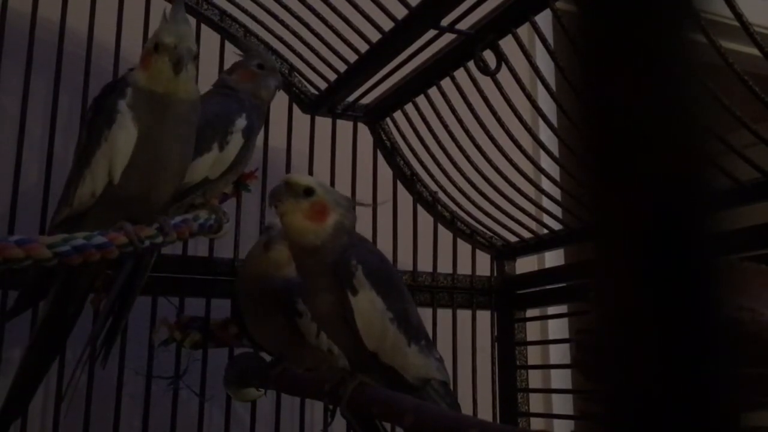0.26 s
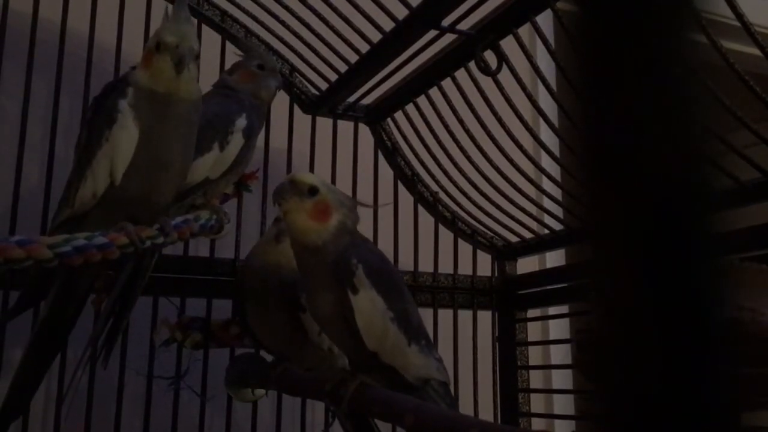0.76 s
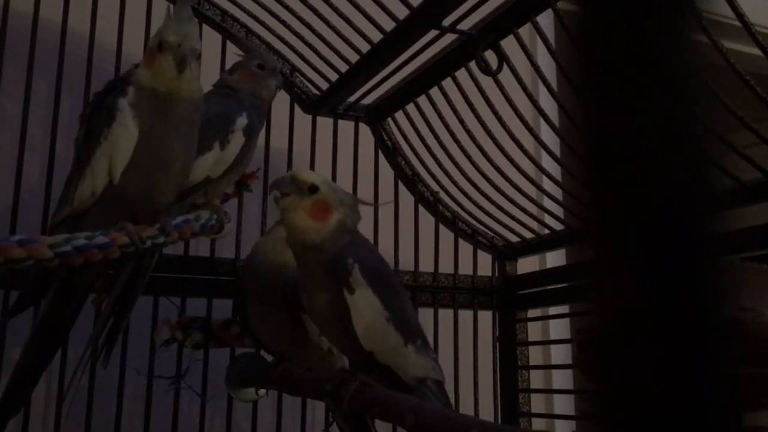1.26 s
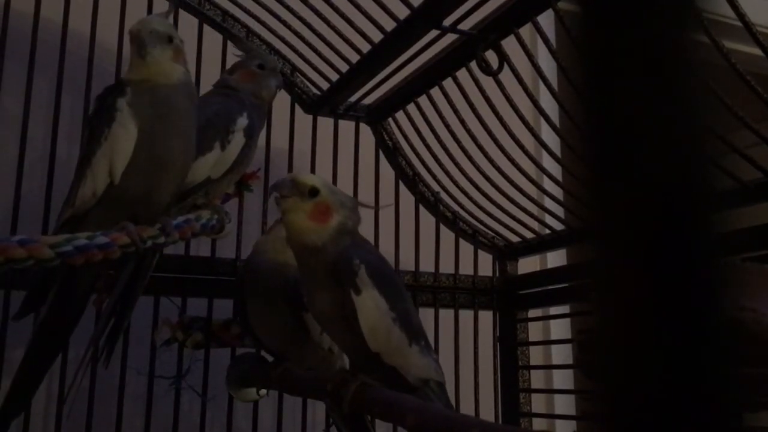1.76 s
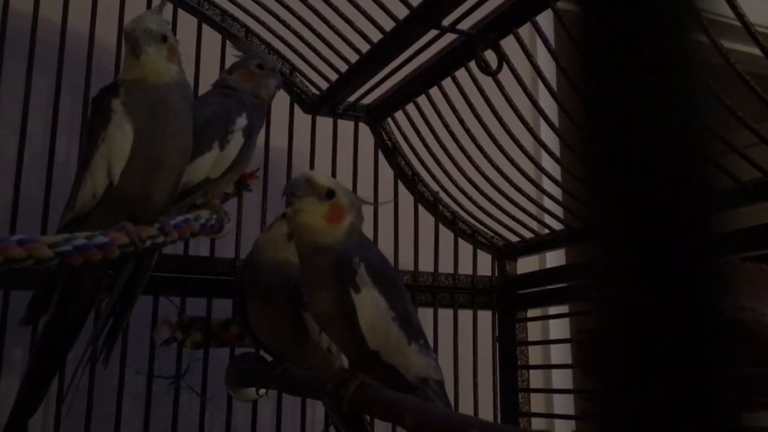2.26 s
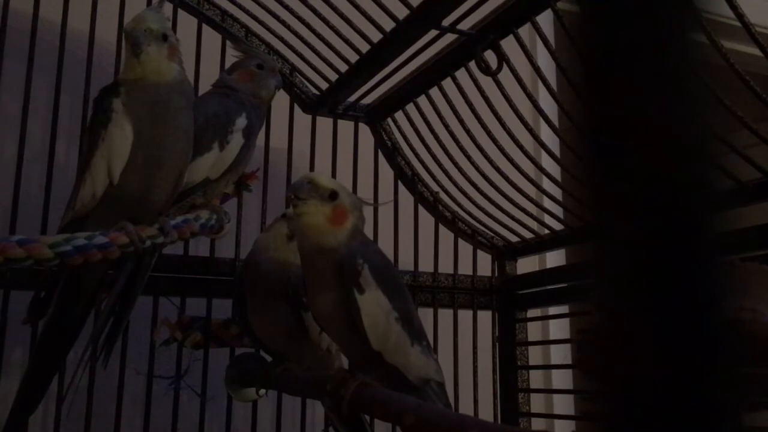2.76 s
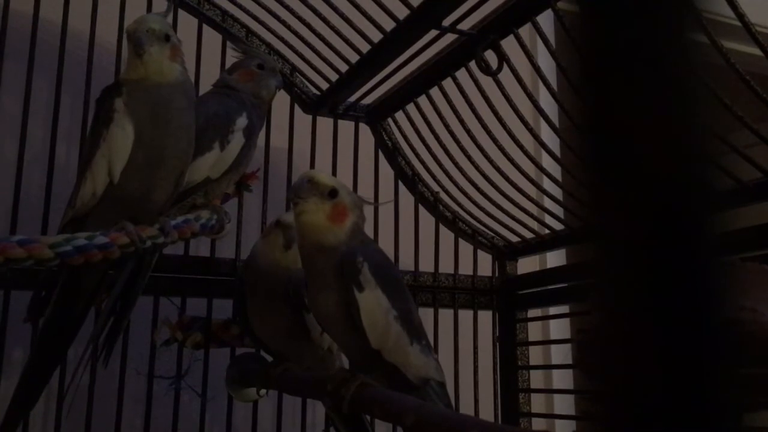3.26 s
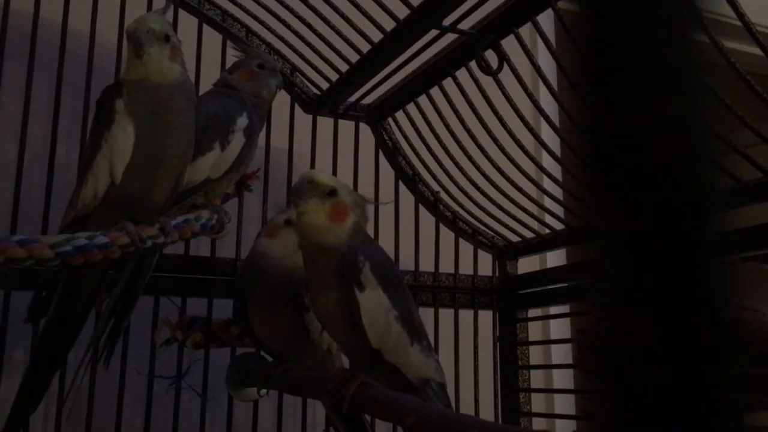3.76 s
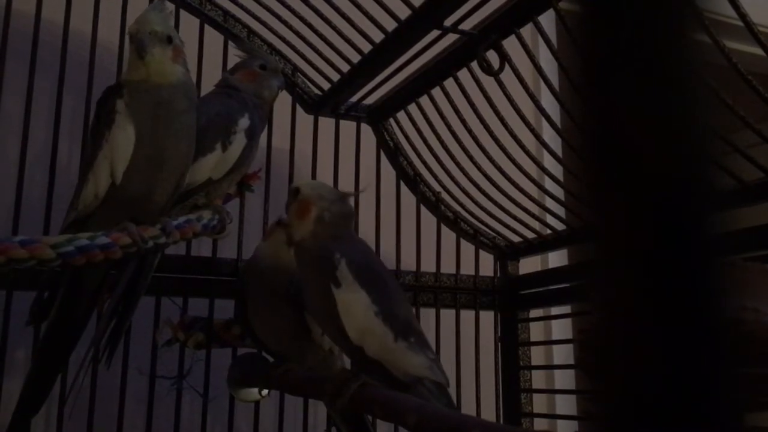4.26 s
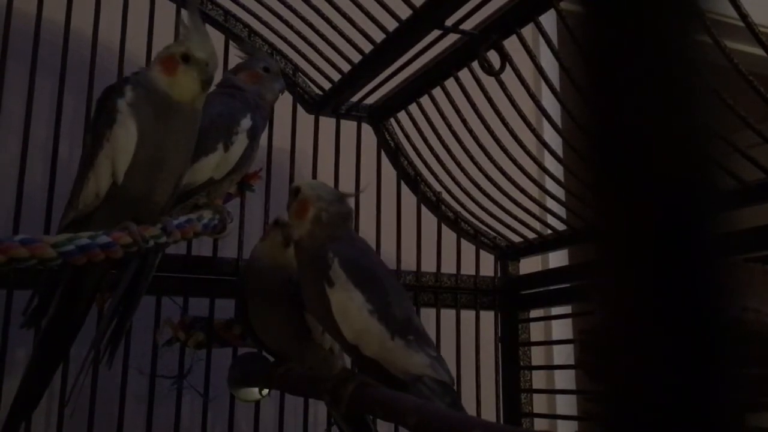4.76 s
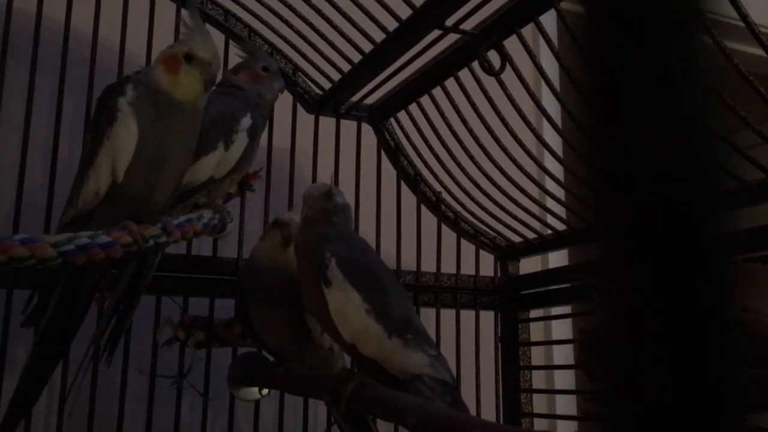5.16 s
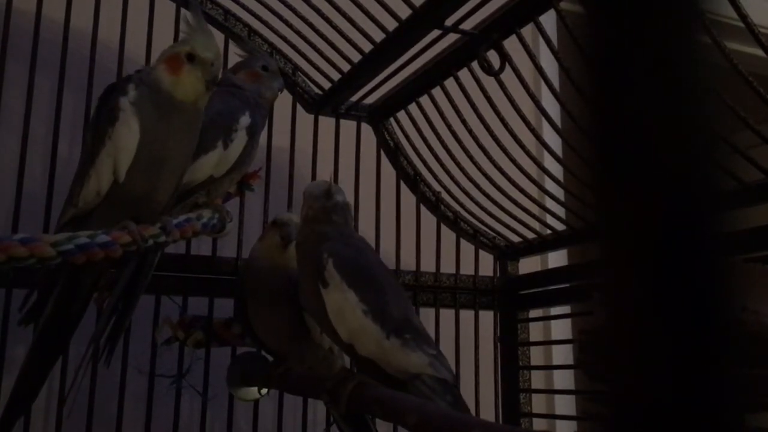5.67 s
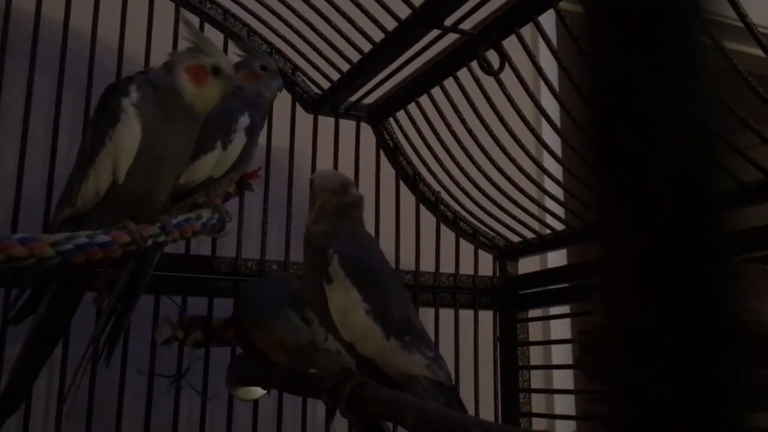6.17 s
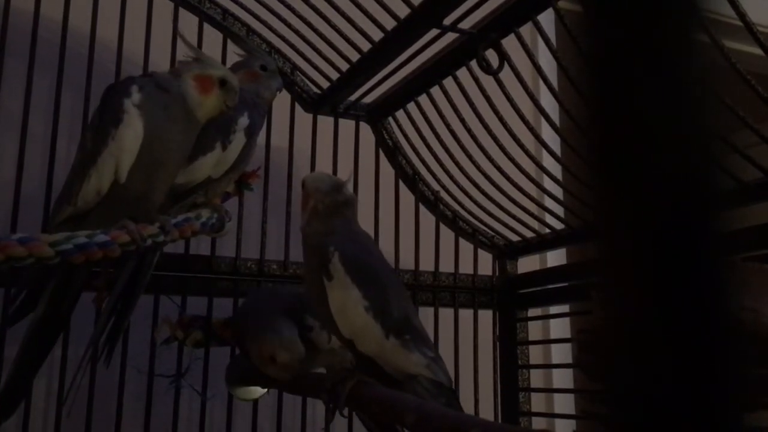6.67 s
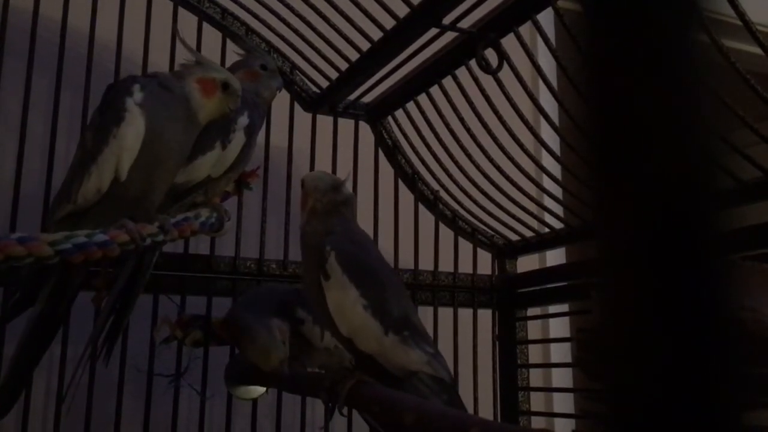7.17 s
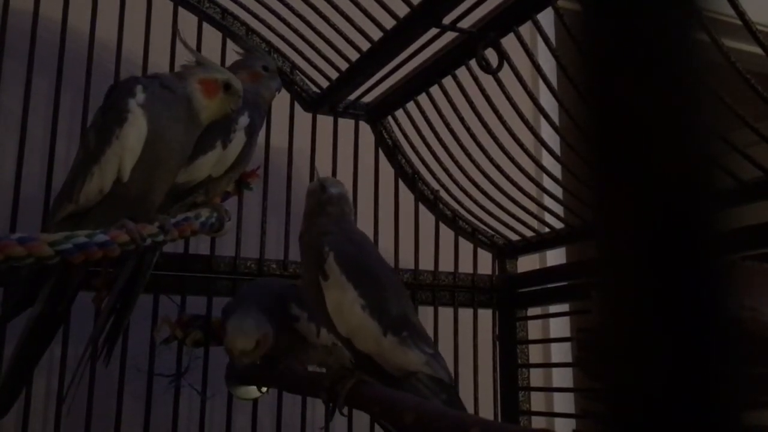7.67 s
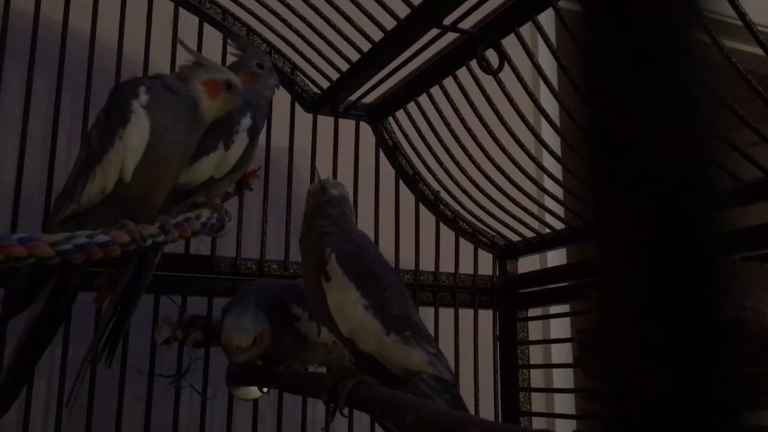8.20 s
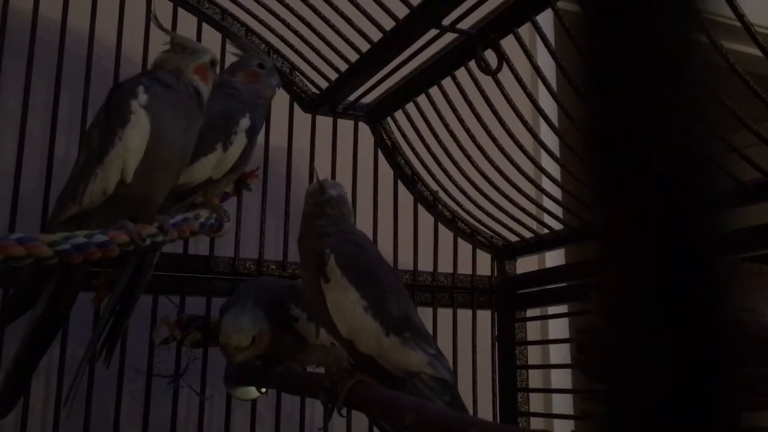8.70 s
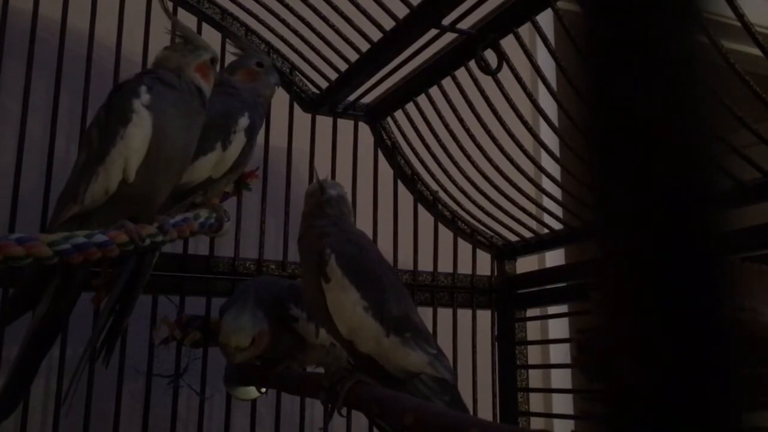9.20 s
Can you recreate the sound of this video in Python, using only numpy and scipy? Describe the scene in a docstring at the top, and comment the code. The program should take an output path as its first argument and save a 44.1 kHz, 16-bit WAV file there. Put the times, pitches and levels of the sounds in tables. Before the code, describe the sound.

A caged cockatiel whistles one clear rising note, then six quick notes that arch and fall away. After a pause it repeats the phrase, and a cage mate adds a soft chirp and a short raspy squawk as the cage is lightly bumped. Faint feather rustles and beak clicks come in between. The birds are close, in a quiet, slightly echoing room with a low appliance hum.

```python
"""A caged cockatiel whistles two phrases, each one rising note, then six arched notes that fall away.
Its syrinx membranes make a nearly pure tone; throat and beak colour the weak overtones.
During the second phrase a cage mate chirps, squawks and rasps, and the bumped cage rings.
Feathers rustle and a beak clicks faintly over an appliance's hum and soft room noise.
Bare walls ring on after each note."""
import sys
import numpy as np
from scipy import signal
from scipy.fft import rfft, irfft, next_fast_len
from scipy.io import wavfile
from scipy.ndimage import uniform_filter1d, map_coordinates

SR = 44100
rng = np.random.default_rng(int(sys.argv[2]) if len(sys.argv) > 2 else 0)


def master(y):
    """Save y as 16-bit WAV."""
    cut = np.clip(np.atleast_2d(y).T, -1, 1)
    pcm = np.round(cut * 32767)  # scale
    wavfile.write(sys.argv[1], SR, pcm.astype(np.int16))


N = 416304
TIME = np.arange(N) / SR

# rising notes: start_s, creep_s, leap_s, hold_s, low_hz, knee_hz, top_hz,
# tone_db, octave_db, upper_db, upper_slope_db_per_octave
RISING_NOTES = [(1.036, .088, 0.066, .04, 1680, 2215, 3530, -14, -35, -34, -10),
                (5.709, .098, .061, .032, 1660, 2277, 3570, -14, -34.5, -37.5, -18)]
# envelope of every rising note: stage (0-3), tone_db, octave_db, upper_db
RISE_ENVELOPE = [(0, -16, 1, -2), (.3, -13, -3.5, -1), (.75, -6, -10.5, 2), (1.1, -6, -6.5, 1.5),
                 (1.7, 1.5, -2.5, 0.5), (2.15, -0.5, 1, -2), (3, -3, -8, -4.5)]
# arched notes: start_s, hold_s, lift_s, crest_s, fall_s, low_hz, top_hz, end_hz, tone_db,
# hold_push_db, octave_db, upper_db, upper_slope_db_per_octave, undertone_db, hiss_db
ARCHED_NOTES = [(1.361, 0.018, 0.044, 0.01, 0.091, 2759.0, 3524.0, 1688.0, -14.5, 9.5, -32.5, -24.5, -6.0, -72, -72.5),
                (1.63, 0.021, 0.062, 0.032, 0.093, 2509.0, 2882.0, 1612.0, -15, -3, -35.5, -22, -12.5, -61, -57.5),
                (1.947, 0.026, 0.06, 0.042, 0.087, 2407.0, 2666.0, 1550.0, -15.5, -4, -38.5, -23.5, -8.5, -57.5, -49),
                (2.266, 0.052, 0.07, 0.023, 0.079, 2325.0, 2492.0, 1510.0, -16, -1, -46, -25.5, -4.5, -62, -54.5),
                (2.607, 0.013, 0.089, 0.036, 0.084, 2286.0, 2489.0, 1459.0, -17, -5.5, -44.5, -26.5, -6.5, -60, -59.5),
                (2.931, 0.045, 0.074, 0.04, 0.063, 2300.0, 2395.0, 1469.0, -17.5, -2.5, -47.5, -28, -4.5, -60.5, -51.5),
                (6.036, 0.005, 0.057, 0.011, 0.097, 2709.0, 3290.0, 1629.0, -16, 8, -40.5, -29, -17.5, -62, -55.5),
                (6.313, 0.015, 0.048, 0.048, 0.087, 2466.0, 2696.0, 1587.0, -15, 1.5, -41, -29, -10.0, -69.5, -71),
                (6.609, 0.032, 0.063, 0.032, 0.085, 2389.0, 2552.0, 1534.0, -16, -2, -46.0, -28.5, -13, -55, -60),
                (6.929, 0.031, 0.075, 0.024, 0.083, 2331.0, 2513.0, 1496.0, -16, -0.5, -50.5, -29.5, -11.5, -57, -59.5),
                (7.252, 0.049, 0.059, 0.036, 0.086, 2384.0, 2536.0, 1496.0, -17, 4, -43.5, -27.5, -9, -57.5, -64),
                (7.598, 0.029, 0.071, 0.032, 0.108, 2324.0, 2466.0, 1371.0, -18, -2, -45, -31.5, -9.5, -56.5, -58.5)]
# envelope of every arched note: stage (0-4), tone_db, octave_db, upper_db
ARCH_ENVELOPE = [(0, -18, -28, -15.5), (1, -13.5, -22, -5), (1.45, -8, -20.5, -1.5),
                 (1.68, -1.5, -9.5, 0.5), (2, -1, -2, -1.5), (3, 0.5, -2.5, -1.5),
                 (3.45, -5.5, -7.5, -13.5), (3.8, -7.5, -5.5, -8.5), (4, -22, -1, -15)]
# base curve of an arch's fall: time_fraction, drop_fraction
FALL_CURVE = [(.15, .12), (.35, .41), (.55, .58), (.8, .76)]
# throat and beak resonances: freq_hz, gain_db
TRACT_RESPONSE = [(4000, -28.5), (5300, -20), (6200, -22.5), (7100, -22), (8000, -31.5), (8800, -31),
                  (9700, -24.5), (10900, -18), (11800, -2), (13000, -9.5), (14300, -13), (15700, -17)]
# air through the beak: freq_hz, gain_db
HISS_SPECTRUM = [(700, -12), (1300, -5), (2500, -1.5), (5000, -12), (7000, -6), (8800, -17.5), (10500, -8),
                 (11800, 4.5), (13500, 1), (15700, -11)]
# cracks at register changes: start_s, level_db
REGISTER_BREAKS = [(1.218, -43.5), (2.682, -46), (3.027, -50.5), (5.821, -41.5)]

# cage mate's nasal chirp: time_s, pitch_hz, level_db
CHIRP_CONTOUR = [(5.982, 1797, -39.5), (5.995, 1850, -43), (6.012, 1858, -43), (6.03, 1907, -47)]
# chirp harmonics: freq_hz, gain_db
CHIRP_SPECTRUM = [(1850, 10), (3700, 10.5), (5600, 7.5), (7400, -5.5), (9300, -17), (11000, -42.5),
                  (15000, -45)]
# two squawk tones, one list each: time_s, pitch_hz, level_db
SQUAWK_CONTOURS = [
    [(6.224, 5530, -42.5), (6.24, 5680, -37), (6.256, 6020, -38.5), (6.282, 5960, -52)],
    [(6.243, 4100, -41.5), (6.258, 4440, -38.5), (6.29, 4566, -39.5), (6.312, 4038, -45)],
]
# rasp under the squawk: time_s, level_db
RASP_ENVELOPE = [(6.21, -76), (6.228, -55), (6.255, -46), (6.285, -48), (6.31, -54), (6.335, -76)]
# rasp noise: freq_hz, gain_db
RASP_SPECTRUM = [(1200, -30.5), (2000, 0.5), (3300, -10), (4300, 0), (5700, -11), (7000, -24), (8600, -17),
                 (10000, -15.5), (12300, -12.5), (15500, -23.5)]

# feather strokes: start_s, length_s, level_db, cutoff_hz
FEATHER_STROKES = [(0.481, 0.18, -71.5, 10000), (0.81, 0.14, -70, 11000), (4.85, .14, -69.5, 1200),
                   (5.378, 0.1, -63.5, 10970), (5.502, .11, -65, 11890), (5.873, 0.56, -66, 12980),
                   (8.748, 0.098, -64, 1090), (9.085, 0.14, -63, 3610)]
# feather noise: freq_hz, gain_db
FEATHER_SPECTRUM = [(60, -25), (200, -6.5), (600, -3.5), (1500, -5.5), (2600, 0.5), (3500, 0), (4600, -9.5),
                    (6000, -3), (8200, -10.5), (10000, -5), (15000, -16.5)]
# beak clicks: start_s, level_db
BEAK_CLICKS = [(.981, -47.5), (4.578, -66)]
# knocks on the cage: start_s, level_db
CAGE_BUMPS = [(6.206, -59.5), (6.245, -53.5)]
# cage modes: freq_hz, gain_db, t60_s
CAGE_MODES = [(165.4, 0, .45), (443.5, -17, .25), (725.3, -6.5, 0.5), (1170, -11.5, .4)]

# appliance tones: freq_hz, level_db
HUM_TONES = [(49.8, -69.5), (120, -77), (199.5, -67.5)]
# room noise: freq_hz, gain_db
AIR_SPECTRUM = [(25, -7), (50, -8), (80, -3.5), (130, -11.5), (180, -7), (260, -12), (430, -16.5),
                (950, -22.5), (2000, -25), (3600, -32), (8000, -37.5), (15500, -43.5)]
# reverb decay: freq_hz, t60_s
ROOM_DECAY = [(200, .6), (1600, 0.71), (2500, 0.72), (3600, 0.68), (5000, .6), (7000, 0.46), (12000, .37),
              (16000, 0.17)]
# colour of the reflections: freq_hz, gain_db
ROOM_RESPONSE = [(200, 2.5), (1700, 1.5), (2500, 0.5), (3600, -1), (5000, 1), (7000, 0.5), (9000, -1),
                 (12000, 1), (13500, -1), (16000, -3.5)]

CREAK_S = .045  # time scale of an arch's hoarse start


def cockatiel(hiss_fade_db=-12, break_t60_s=.022):
    """Two whistled phrases; air hisses through the beak at hoarse starts and register breaks."""
    notes, breath = np.zeros(N), np.zeros(N)
    for *row, slope_db in RISING_NOTES:
        n, note = whistle(rise_contour(row), -np.inf, slope_db)
        notes[n] += note
    t = np.arange(int(2 * CREAK_S * SR)) / SR
    for *row, slope_db, undertone_db, hiss_db in ARCHED_NOTES:
        n, note = whistle(arch_contour(row), undertone_db, slope_db)
        notes[n] += note
        add_at(breath, row[0], amp(hiss_db + hiss_fade_db * t / CREAK_S))
    t = np.arange(SR // 20) / SR
    for start_s, level_db in REGISTER_BREAKS:
        add_at(breath, start_s, amp(level_db - 60 * t / break_t60_s))
    breath = uniform_filter1d(breath, size=260)  # airflow builds over a few ms
    return notes + breath * noise(HISS_SPECTRUM) * amp(2.5 * wobble(400, TIME))


def rise_contour(row, drift_hz=84):
    """Creep, leap, hold drifting sharp. Returns time_s, pitch_hz, tone_db, octave_db, upper_db."""
    start_s, *lengths_s, low_hz, knee_hz, top_hz, tone_db, octave_db, upper_db = row
    t, (creep, leap, hold) = stages(lengths_s)
    creep_hz = (knee_hz - low_hz) * creep ** 1.9
    leap_hz = (top_hz - knee_hz) * np.sin(np.pi / 2 * leap) ** 1.2
    pitch_hz = low_hz + creep_hz + leap_hz + drift_hz * hold
    tone, octave, upper = envelope_db(RISE_ENVELOPE, creep + leap + hold)
    return np.transpose([start_s + t, pitch_hz, tone_db + tone, octave_db + octave, upper_db + upper])


def arch_contour(row, scoop_hz=55, scoop_s=.022, sag_hz_per_s=2200, plunge_hz=2556, pure_hz=2830):
    """Soft hold, swelling lift, crest, fading fall. Same columns as rise_contour."""
    start_s, *lengths_s, low_hz, top_hz, end_hz, tone_db, push_db, octave_db, upper_db = row
    t, (hold, lift, crest, fall) = stages(lengths_s)
    sag_hz = sag_hz_per_s * lengths_s[2] * crest ** 2
    held_hz = low_hz + scoop_hz * np.exp(-t / scoop_s) + (top_hz - low_hz) * ease(lift) - sag_hz
    curve = np.transpose([(0, 0), *FALL_CURVE, (1, 1)])
    drop = np.interp(fall, *curve) ** ((plunge_hz / top_hz) ** 2.1)  # higher notes fall earlier
    pitch_hz = held_hz + (end_hz - held_hz) * drop
    tone, octave, upper = envelope_db(ARCH_ENVELOPE, hold + lift + crest + fall)
    dip_db = -7.5 * np.exp(-((pitch_hz - 1932) / 16) ** 2)  # brief dip on the way down
    tone += push_db * (1 - ease(lift)) + dip_db
    upper -= 18.5 * np.maximum(pitch_hz - pure_hz, 0) / 1000  # high crests are purer
    return np.transpose([start_s + t, pitch_hz, tone_db + tone, octave_db + octave, upper_db + upper])


def whistle(contour, undertone_db, slope_db_per_octave, flutter_db=3, strain_hz=3300, quaver_hz=85):
    """One nearly pure note whose weak overtones sweep through the tract's resonances."""
    n, t, on, (pitch_hz, tone_db, octave_db, upper_db) = sample_contour(contour)
    # membranes shake in fast glides and quaver at the top of the range
    glide = np.clip(np.abs(np.gradient(np.log(pitch_hz), t)) / 6, 0, 1)
    strain = np.clip((pitch_hz - strain_hz) / 250, 0, 1)
    quaver = strain * np.sin(2 * np.pi * quaver_hz * (t - t[0]) + wobble(40, t))
    phase = syrinx_phase(pitch_hz * (1 + .017 * quaver), t, jitter=.0021 + .0076 * glide)
    tone = amp(tone_db + .54 * wobble(53.7, t) + .4 * wobble(120, t) + quaver) * np.sin(phase)
    overtones = amp(octave_db + flutter_db * wobble(60, t)) * np.sin(2 * phase)
    for k in range(3, 11):
        level_db = upper_db + slope_db_per_octave * np.log2(k / 3) + at_hz(TRACT_RESPONSE, k * pitch_hz)
        level_db += flutter_db * wobble(84, t)
        overtones += amp(level_db) * (k * pitch_hz < SR / 2) * np.sin(k * phase)
    overtones *= 1 + amp(-29 + 15 * glide) * wobble(2500, t)  # turbulent air
    # at low pressure alternate cycles differ, adding half-harmonics
    start_s = contour[0][0]
    creak = amp(undertone_db - 7 * (t - start_s) / CREAK_S)
    creak *= gate(t, start_s, start_s + 2 * CREAK_S, edge_s=.008)
    halves = np.sin(phase / 2 + 1.1 * wobble(220, t)) + .5 * np.sin(3 * phase / 2 + 1.5 * wobble(300, t))
    return n, np.sqrt(2) * on * (tone + overtones + creak * halves)


def syrinx_phase(pitch_hz, t, jitter):
    """Phase of vibrating membranes whose tension trembles."""
    tremble = wobble(130, t) + .6 * wobble(580, t)
    return 2 * np.pi * np.cumsum(pitch_hz * (1 + jitter * tremble)) / SR


def cage_mate(warble_hz=97, warble_depth=.083, flutter_db=3):
    """A rough harmonic chirp, then two fast-warbling tones that squawk over a noisy rasp."""
    rasp_db = np.interp(TIME, *np.transpose(RASP_ENVELOPE), left=-150, right=-150)
    out = amp(rasp_db + flutter_db * wobble(160, TIME)) * noise(RASP_SPECTRUM)
    n, t, on, (pitch_hz, level_db) = sample_contour(CHIRP_CONTOUR)
    phase = syrinx_phase(pitch_hz, t, jitter=.02)
    for k in range(1, 8):
        out[n] += on * amp(level_db + at_hz(CHIRP_SPECTRUM, k * pitch_hz)) * np.sin(k * phase)
    for contour in SQUAWK_CONTOURS:
        n, t, on, (pitch_hz, level_db) = sample_contour(contour)
        warble = np.sin(2 * np.pi * warble_hz * (t - t[0]) + .5 * wobble(60, t))
        phase = syrinx_phase(pitch_hz * (1 + warble_depth * warble), t, jitter=.022)
        out[n] += on * amp(level_db - 4.2 * warble) * np.sin(phase)
    return out


def feathers(fade_db=-3.5):
    """Feathers brush as the birds shift: fading strokes of low-passed noise."""
    out = np.zeros(N)
    brush = noise(FEATHER_SPECTRUM) * amp(2.5 * wobble(60, TIME))
    for start_s, length_s, level_db, cutoff_hz in FEATHER_STROKES:
        stroke = unit_rms(filtered(brush, lambda hz: 1 / (1 + (hz / cutoff_hz) ** 6)))
        progress = np.clip((TIME - start_s) / length_s, 0, 1)
        on = gate(TIME, start_s, start_s + length_s, edge_s=.05)
        out += amp(level_db + fade_db * progress) * on * stroke
    return out


def beak_clicks(t60_s=.011):
    """Light beak clicks: fast-decaying noise bursts."""
    out = np.zeros(N)
    t = np.arange(SR // 2) / SR
    for start_s, level_db in BEAK_CLICKS:
        add_at(out, start_s, amp(level_db - 60 * t / t60_s) * rng.standard_normal(len(t)))
    return out


def cage_bumps():
    """Each knock rings the cage's damped modes."""
    out = np.zeros(N)
    t = np.arange(SR // 2) / SR
    for start_s, level_db in CAGE_BUMPS:
        for hz, gain_db, t60_s in CAGE_MODES:
            add_at(out, start_s, amp(level_db + gain_db - 60 * t / t60_s) * np.sin(2 * np.pi * hz * t))
    return out


def room_reverb(x, early_db=-8.5, tail_db=-15, early_t60_s=.078):
    """Near walls scatter early echoes; a diffuse tail follows, shorter in the treble."""
    hz, frame_s, spectrum = signal.stft(rng.standard_normal(SR), SR, nperseg=256)
    decay = amp(-60 * frame_s / at_hz(ROOM_DECAY, hz)[:, None])
    t = np.arange(SR) / SR
    tail = signal.istft(spectrum * decay, SR, nperseg=256)[1][:SR] * np.clip(t / .01, 0, 1)
    early = rng.standard_normal(SR) * (rng.random(SR) < .02)
    early *= (t > .003) * amp(-60 * t / early_t60_s)
    impulse = amp(early_db) * early / np.linalg.norm(early) + amp(tail_db) * tail / np.linalg.norm(tail)
    return filtered(signal.fftconvolve(x, impulse)[:N], lambda f: amp(at_hz(ROOM_RESPONSE, f)))


def appliance_hum():
    """Low tones, slightly unsteady in level and phase."""
    hum = np.zeros(N)
    for hz, level_db in HUM_TONES:
        gain = amp(level_db + 1.1 * wobble(7, TIME))
        hum += gain * np.sin(2 * np.pi * hz * TIME + .3 * wobble(4, TIME))
    return np.sqrt(2) * hum


def room_noise(gain_db=-64, low_cut_hz=42):
    """Soft noise, thinned in the deep bass."""
    return amp(gain_db) * filtered(noise(AIR_SPECTRUM), lambda hz: hz ** 4 / (hz ** 4 + low_cut_hz ** 4))


def stages(lengths_s):
    """Times through a note and each stage's 0-1 progress."""
    lengths_s = np.maximum(lengths_s, 1e-3)
    t = np.linspace(0, lengths_s.sum(), 200)
    starts_s = np.cumsum(lengths_s) - lengths_s
    return t, np.clip((t - starts_s[:, None]) / lengths_s[:, None], 0, 1)


def envelope_db(envelope, stage):
    """Tone, octave and upper overtone offsets at a stage."""
    knots, *columns = np.transpose(envelope)
    return [np.interp(stage, knots, c) for c in columns]


def sample_contour(contour):
    """Sample indices, times, gate and smoothed columns of one call."""
    time_s, *columns = np.transpose(contour)
    n = np.arange(int(time_s[0] * SR) - SR // 100, int(time_s[-1] * SR) + SR // 100)
    t = n / SR
    smooth = [uniform_filter1d(np.interp(t, time_s, c), size=220) for c in columns]
    return n, t, gate(t, time_s[0], time_s[-1], edge_s=.0072), smooth


def amp(db):
    """Decibels to gain."""
    return 10 ** (np.asarray(db) / 20)


def unit_rms(x):
    """Scale to rms 1."""
    return x / np.sqrt(np.mean(x ** 2) + 1e-20)


def at_hz(points, hz):
    """Interpolate (freq_hz, value) points on a log axis."""
    freq_hz, values = np.transpose(points)
    return np.interp(np.log(hz + 1), np.log(freq_hz), values)


def wobble(rate_hz, t):
    """Smooth random curve, rate_hz knots a second."""
    u = (t - t[0]) * rate_hz
    return map_coordinates(rng.standard_normal(int(u[-1]) + 4), [u])


def filtered(x, response):
    """Apply the gain response(hz)."""
    size = next_fast_len(len(x) + SR // 4)
    return irfft(rfft(x, size) * response(np.fft.rfftfreq(size, 1 / SR)), size)[:len(x)]


def noise(spectrum):
    """Unit-rms noise shaped by (freq_hz, gain_db) points."""
    return unit_rms(filtered(rng.standard_normal(N), lambda hz: amp(at_hz(spectrum, hz))))


def ease(u):
    """Smooth step from 0 to 1."""
    return np.sin(np.pi / 2 * u) ** 2


def gate(t, start_s, end_s, edge_s):
    """Soft-edged on-off window."""
    return ease(np.clip(np.minimum(t - start_s, end_s - t) / edge_s + .5, 0, 1))


def add_at(out, start_s, x):
    """Mix x into out at start_s."""
    out[int(start_s * SR):][:len(x)] += x


def scene():
    """Birds and cage close by, the room around them; mono."""
    direct = cockatiel() + cage_mate() + feathers() + beak_clicks() + cage_bumps()
    return (direct + room_reverb(direct) + appliance_hum() + room_noise())[None]


def record(dry, cutoff_hz=15800):
    """Brick-wall low-pass."""
    return np.array([filtered(channel, lambda hz: hz < cutoff_hz) for channel in dry])


dry = scene()
out = record(dry)
master(out)
```